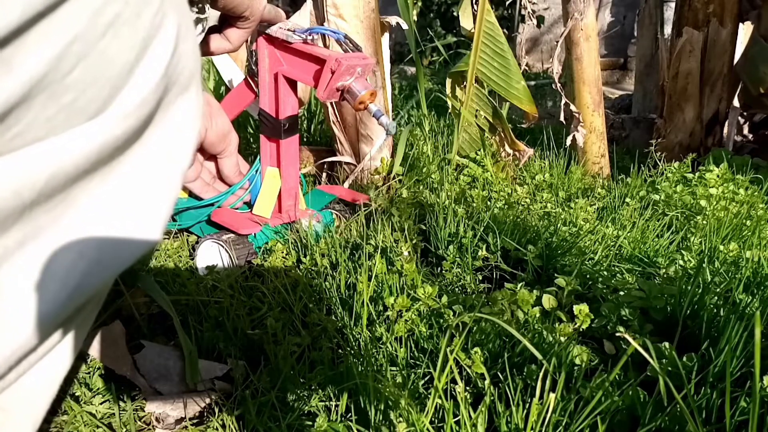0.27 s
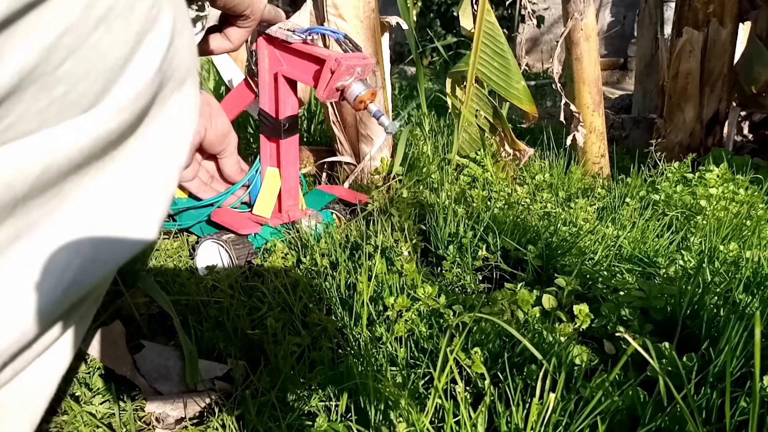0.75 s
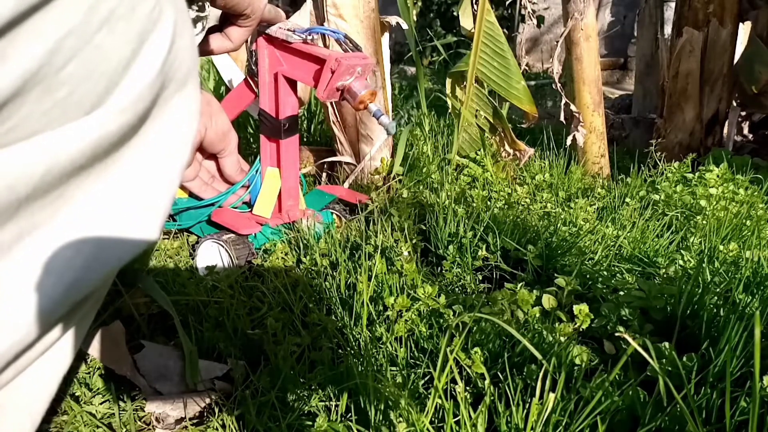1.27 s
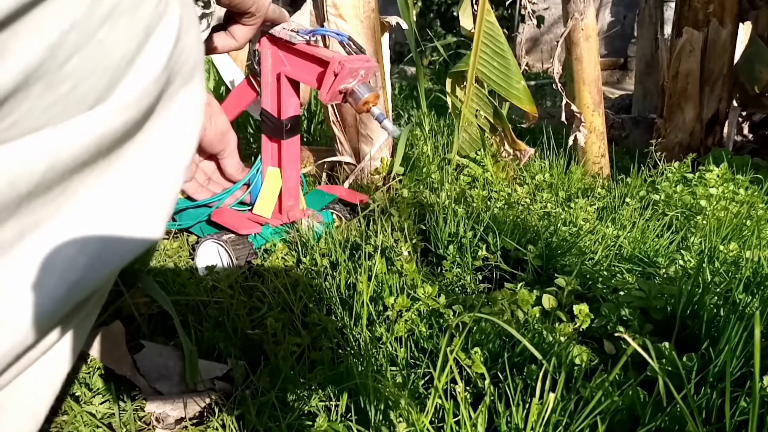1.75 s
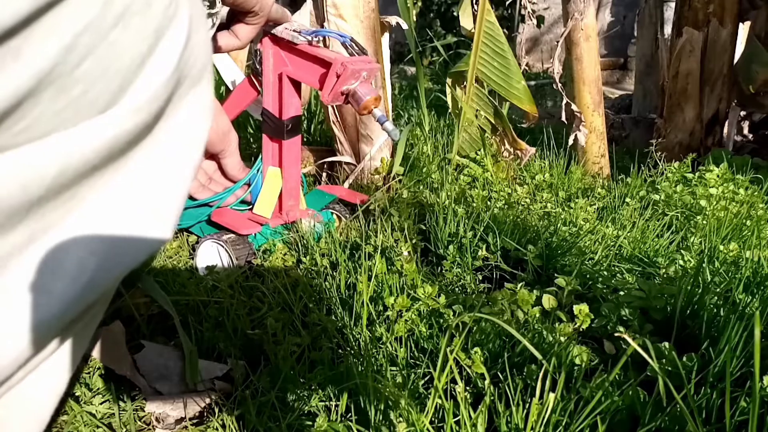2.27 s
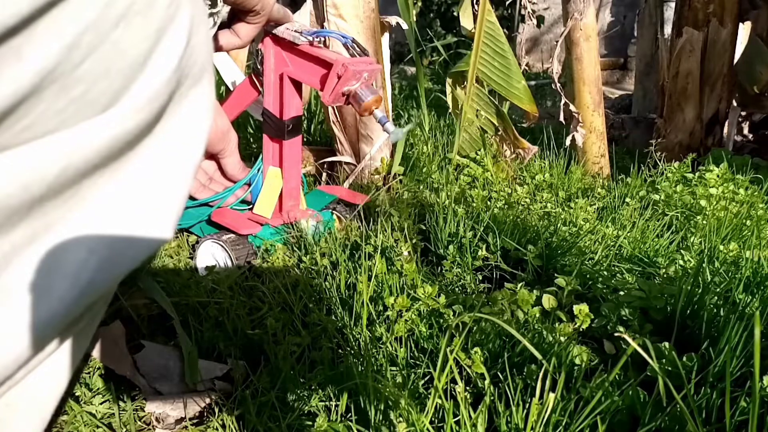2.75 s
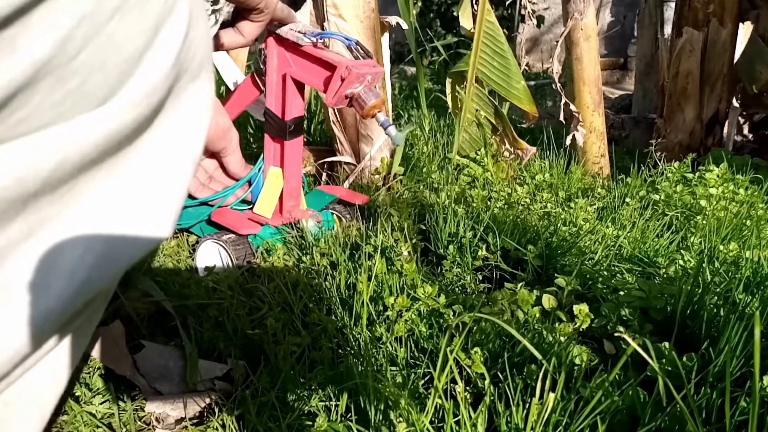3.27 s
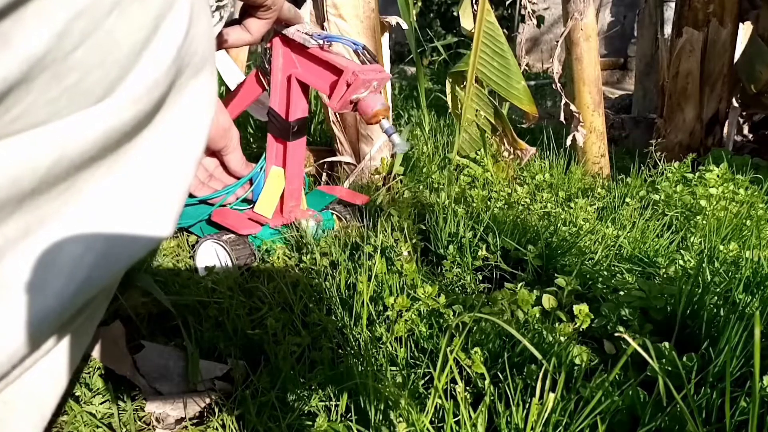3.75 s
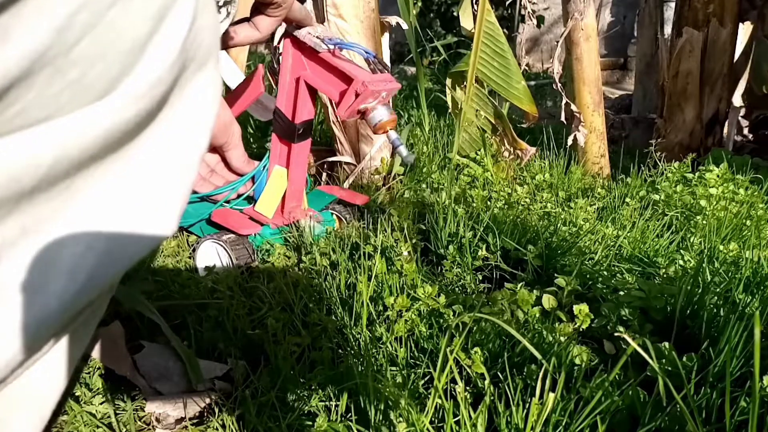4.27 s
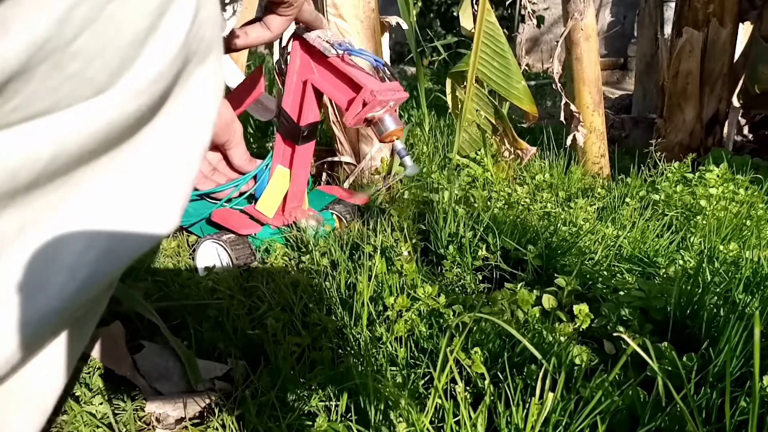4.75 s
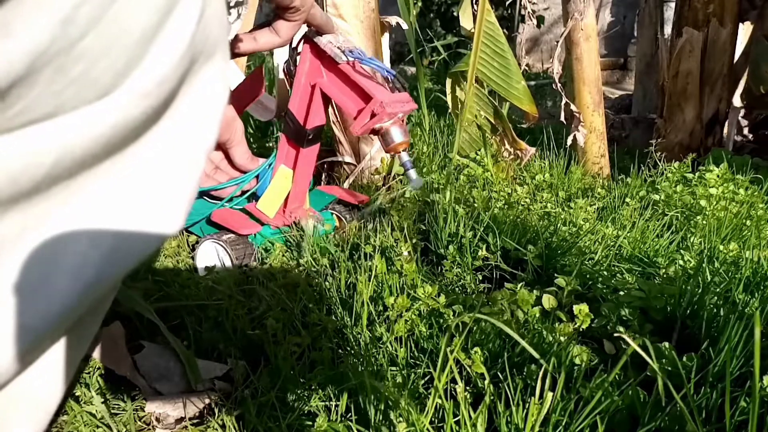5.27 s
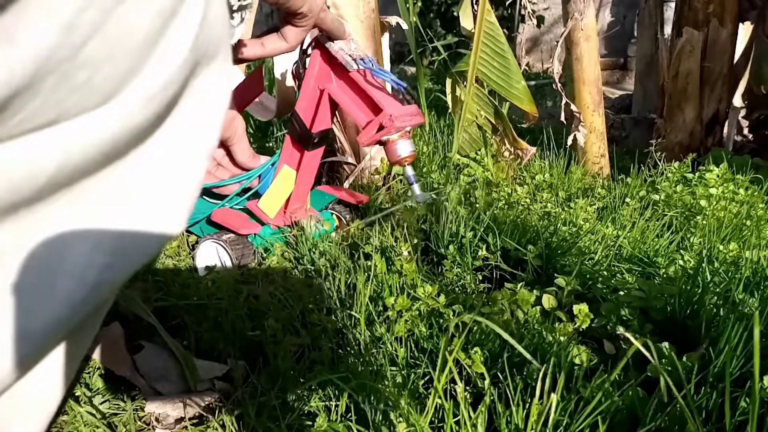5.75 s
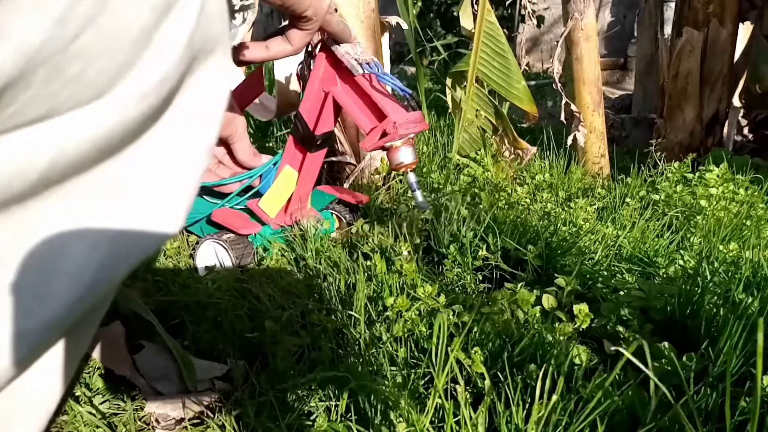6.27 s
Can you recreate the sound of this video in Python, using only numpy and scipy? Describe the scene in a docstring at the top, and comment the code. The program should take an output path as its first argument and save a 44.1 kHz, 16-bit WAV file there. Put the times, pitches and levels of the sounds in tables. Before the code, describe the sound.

Heard close and dry outdoors, in the right channel only, with the left silent. After a near-silent instant, a small brushless motor gives rapid rattling jerks from 0.05 to 0.2 seconds, then catches and settles into a light idle: bearing rattle, thin high electric whine and a soft airy swish from its whirling wire. Around 0.9 to 1.2 seconds it steps up, brighter and louder. From 2.1 to 2.5 it surges to full speed, whine tones fanning out and the swish sweeping up into a loud, piercing hiss, flaring briefly, over a low fluttering hum. It holds steady; from about 3.5 the hum slowly grows. From 4.9 the wire works into grass: buzzing, rough knocking and crackling snaps strengthen, with soft air thumps around 5.6 to 5.8 and sharper bites near 6 and 6.4. It is still running at the end, about 6.5 seconds.

```python
"""Wire grass trimmer, close up

A small brushless motor whirls a two-ended cutting wire over a lawn; one microphone feeds the right channel.
It chatters into life and is throttled up in three steps. The chopped drive current is a set of sines that
whine; the wire's swish is noise read along its path, so its pitch climbs with speed.
At full throttle the head tips down: grass snaps and a frame buzz, patterned once a turn, grow louder as the
wire bites, and puffs of air buffet the microphone."""
import sys
import numpy as np
from scipy import signal
from scipy.fft import rfft, irfft, next_fast_len
from scipy.io import wavfile
from scipy.ndimage import map_coordinates

SR = 44100
rng = np.random.default_rng(int(sys.argv[2]) if len(sys.argv) > 2 else 0)


def unload_wav(signal):
    """Save mono or channel-first audio to the path in sys.argv[1] as 16-bit WAV at rate SR, clipped to [-1, 1]."""
    wavfile.write(
        sys.argv[1],
        SR,
        np.round(np.clip(np.atleast_2d(signal).T, -1, 1) * 32767).astype(np.int16),
    )


N = 287091
TIME = np.arange(N) / SR
FULL_SPEED_HZ = 117  # shaft turns per second
LOADING_S = (4.9, 6.05)  # the wire works its way into the grass (from, to)

# Throttle steps idle, half, full. Each row: start in seconds, time the knob takes in seconds,
# shaft turns per second asked for.
THROTTLE = [(.154, .002, 57.8), (.911, .206, 73.9), (2.104, .322, 116.9)]
SPIN_UP_S = 0.114  # time constant
CREEP_FROM_S, CREEP_HZ_PER_S = 5.35, 2.9


def shaft():
    """The rotor lags the throttle, then creeps up; strain (0-1) is the share of the asked speed still missing."""
    asked = np.zeros(N)
    for start_s, knob_s, hz in THROTTLE:
        asked = asked + (hz - asked) * ramp(start_s, start_s + knob_s)
    keep = np.exp(-1 / (SPIN_UP_S * SR))
    speed = signal.lfilter([1 - keep], [1, -keep], asked)
    strain = (asked - speed) / (asked + 1e-9)
    creep = CREEP_HZ_PER_S * np.maximum(TIME - CREEP_FROM_S, 0)
    unsteadiness = 1 + 0.001 * walk(16) + 0.0012 * walk(1.5)
    return (speed + creep) * unsteadiness, strain


# Broad turbulence of the wire, as read at full speed. Each row: frequency in Hz, relative density in dB per Hz.
TURBULENCE = [(60, -81), (160, -12), (330, -17), (700, -17.5), (1300, -20.5), (2500, -11), (3800, -6.5),
              (5000, 3), (7200, 6.5), (8400, -11), (10500, -21), (16000, -25.5)]
# Brief dips of the swish. Each row: centre in seconds, half-width in seconds, depth in dB.
DIPS = [(6.126, 0.022, -6.5), (6.347, 0.036, -3.5), (6.5, 0.047, -2.5)]
SWISH_DB, SWISH_DB_PER_DOUBLING = -21, 16.5  # at full speed; growth with speed
SWISH_STRAIN_DB = 39  # per unit strain at full speed


def swish(turns, speed, strain, running):
    """The wire sheds eddies, orderly when slow and more turbulent when fast; they flare as each end sweeps by."""
    eddies = eddy_tone(speed)
    envelope = np.abs(signal.hilbert(eddies))
    eddies = unit(eddies / (envelope + 0.1) ** 0.16)  # shedding limits its own strength
    turbulence = whirl(TURBULENCE, turns) * undb(0.4 * walk(8))
    eddy_gain = by_throttle(speed, levels_db=[-13.5, -7.0, -6.5]) * by_load(0, loaded_db=-2.4)
    turbulence_gain = by_throttle(speed, levels_db=[-9.5, -10.0, -7.0]) * by_load(0, loaded_db=0.4)
    air_noise = eddy_gain * eddies + turbulence_gain * turbulence
    flare = unit(1 + 1.2 * np.exp(-(2 * turns % 1) / 0.15))
    flutter = undb(0.55 * walk(40) + 0.25 * walk(9))
    # louder while the wire is being flung up to full speed
    strain_db = SWISH_STRAIN_DB * strain * (speed / FULL_SPEED_HZ) ** 3
    dips_db = sum(db * bump(s, width_s) for s, width_s, db in DIPS)
    gain = speed_law(speed, SWISH_DB_PER_DOUBLING) * undb(SWISH_DB + strain_db + dips_db)
    return air_noise * flare * flutter * running * gain


# Eddy tone of the wire, as read at full speed. Each row: frequency in Hz, relative density in dB per Hz.
EDDIES = [(60, -65), (3500, -29), (5000, -26), (5600, -1), (6400, 4.5), (6950, 1), (7600, -29), (8400, -45),
          (16000, -74)]
EDDY_HOLD_HZ, EDDY_BREAK_HZ = 81.6, (81.5, 109.7)  # turns per second: pitch holds; band breaks over (from, to)


def eddy_tone(speed):
    """Orderly eddies climb with speed, hold their pitch, then give way to a higher band."""
    low = whirl(EDDIES, np.cumsum(np.minimum(speed, EDDY_HOLD_HZ)) / SR)
    high = whirl(EDDIES, np.cumsum(np.sqrt(speed * FULL_SPEED_HZ)) / SR)
    share = np.interp(speed, EDDY_BREAK_HZ, [0, 1])
    return np.sqrt(1 - share) * low + np.sqrt(share) * high


def whirl(spectrum, turns):
    """Noise read off along the wire's path, so that its whole spectrum scales with speed."""
    noise = signal.resample_poly(colour(rng.standard_normal(N), spectrum), 2, 1)
    return unit(map_coordinates(noise, [2 * SR * turns / FULL_SPEED_HZ], order=3, mode="wrap"))


# The controller's chopping rate sags as it works harder. Each row: time in seconds, rate in Hz.
CHOP_RATE = [(0.1, 7975), (0.8, 7950), (1.8, 7942), (2.9, 7912), (5.2, 7909), (6.4, 7900)]
# Bare chopping tone, before CHOP_GAIN_DB. Each row: time in seconds, level in dB.
CHOP_LEVEL = [(0.0, -54), (0.16, -49), (0.36, -66), (0.7, -52), (0.94, -68), (1.41, -53), (1.68, -54),
              (2.35, -38.5), (4.31, -38.5), (4.51, -49), (4.72, -46.5), (5.18, -31.5), (5.79, -33.5),
              (6.5, -31.5)]
CHOP_GAIN_DB = -1.5
# Magnetic whine. Each key: multiple of the chopping rate, plus multiple of the shaft rate.
# Each value: level in dB at half throttle, level in dB at full, change under load in dB.
WHINE = { (0, 35): (-53, -52, 5), (0, 63): (-66, -42.5, -6), (0, 70): (-57, -72, 0),
         (1, -42): (-50.5, -67, 13.4), (1, -35): (-50.5, -65, 0), (1, -21): (-60, -46, 7),
         (1, -14): (-49.5, -40.5, 4.3), (1, 10): (-67, -60, -2), (1, 14): (-48.5, -45.5, -5),
         (1, 21): (-63, -69, 0), (1, 28): (-67, -72, 0), (2, -14): (-66, -77, -4), }
MAGNETS = 14  # the strongest side tones lie one magnet-passing rate either side of the chopping tone
WHINE_IDLE_DB = -9.5  # all tones, idle against half throttle
WHINE_STRAIN_DB = 9  # strongest pair, per unit strain


def whine(turns, speed, strain, running):
    """The chopped current sings in the windings; commutation splits off side tones that fan out with speed."""
    chop = np.cumsum(np.interp(TIME, *np.transpose(CHOP_RATE)) + 2 * walk(14)) / SR
    chop_db = np.interp(TIME, *np.transpose(CHOP_LEVEL)) + CHOP_GAIN_DB
    out = undb(chop_db) * tone(chop, waver_db=0.5, waver_rate=18)
    surge = np.sqrt(running) * undb(WHINE_STRAIN_DB * strain)
    for (c, k), (half_db, full_db, load_db) in WHINE.items():
        # the strongest pair follows the current from the first turn; the others need speed
        drive = surge if c == 1 and abs(k) == MAGNETS else running ** 4
        gain = by_throttle(speed, [half_db + WHINE_IDLE_DB, half_db, full_db]) * by_load(0, load_db)
        # plain commutation tones are rough, side tones clean
        blur = 0.2 * walk(75) if c == 0 else 0
        out = out + drive * gain * tone(c * chop + k * turns + blur, waver_db=1.5, waver_rate=9)
    return out


# Magnets passing the stator slots. Each row: multiple of the shaft rate, housing resonance in Hz,
# its width in Hz, level at resonance in dB.
SLOTS = [(37, 1860, 450, -55), (105, 5350, 300, -52)]


def slots(turns, running):
    """Magnets passing the stator slots whistle, loudest while the pitch climbs through a housing resonance."""
    out = 0
    for k, hz, width_hz, db in SLOTS:
        whistle = tone(k * turns + 0.1 * walk(40), waver_db=1.5, waver_rate=11)
        out = out + ring(whistle, [(hz, width_hz, db)])
    return running ** 4 * out


# Bursts of chatter, mostly before the rotor locks to the drive. Each row: start in seconds,
# length before release in seconds, drive level in dB.
JERKS = [(0.054, 0.0024, -41.5), (0.064, 0.0021, -35), (0.073, .002, -36), (0.0805, 0.012, -33),
         (0.107, .012, -31.5), (.126, .003, -36), (0.14, 0.027, -31), (0.176, .006, -30.5),
         (.541, .001, -36)]
JERK_RELEASE_S = 0.004
# Resonances of motor and mount. Each row: frequency in Hz, width in Hz, relative gain in dB.
HOUSING = [(720, 590, -20.5), (1907, 200, -10), (2575, 300, -8.5), (4125, 260, -5), (4520, 160, 0),
           (5400, 244, 1.5), (5950, 120, 1), (6320, 620, -6.5), (7850, 290, -7), (8520, 370, -15.5),
           (10300, 1900, -20), (13000, 6400, -30)]
RATTLE_FROM_HZ = (6.1, 18)  # bearings fade in between these turns per second
RATTLE_DB = (-40.5, -35.5, -35)  # bearing drive at idle, half, full throttle
RATTLE_STRAIN_DB = 8.5  # per unit strain


def rattle(speed, strain):
    """The rotor jerks at start-up, then the bearings rattle on; both ring the housing; one thin ring stands out."""
    jerks = 0
    for start_s, length_s, db in JERKS:
        release = np.exp(-np.maximum(TIME - start_s - length_s, 0) / JERK_RELEASE_S)
        jerks = jerks + undb(db) * (TIME >= start_s) * release
    onset = np.interp(speed, RATTLE_FROM_HZ, [0, 1])
    bearing_gain = onset * by_throttle(speed, RATTLE_DB) * undb(RATTLE_STRAIN_DB * strain)
    bearings = bearing_gain * unit(grains(rate=6000, spread_db=2.5))
    shake = jerks * rng.standard_normal(N) + bearings
    thin_ring = unit(ring(rng.standard_normal(N), [(5190, 27, 0)])) * by_load(free_db=-39, loaded_db=-50)
    return undb(4.5) * ring(shake, HOUSING) + speed_law(speed, db_per_doubling=27) * thin_ring


# Weaker hum of the unbalanced rotor and the wire. Each key: multiple of the shaft rate.
# Each value: level in dB at full speed running free, the same under load, growth in dB per doubling of speed.
HUM = {1: (-54.5, -55.5, 23), 3: (-65, -53, 26), 4: (-57, -56, 17), 5: (-68, -59.5, 22),
       6: (-63.5, -61, 15.4), 8: (-66, -64, 9), 11: (-81, -59, 0), 12: (-70, -73, 6), 13: (-85, -58, 6),
       14: (-63.5, -78, 9.7)}
TIPPING_S = (3.45, 6.56)  # the head tips down (from, to)
# main hum: at full speed, gain as the head tips, loss under load
MAIN_HUM_DB, MAIN_TIP_DB, MAIN_LOAD_DB = -42.5, 6.5, -4


def hum(turns, speed, running):
    """Each wire end pushes air once a turn, so the second order leads; the wire's flexing blurs higher ones."""
    orders = 0
    for k, (free_db, loaded_db, slope_db) in HUM.items():
        flex = 0.016 * min(k, 8) * walk(40)
        gain = by_load(free_db, loaded_db) * speed_law(speed, slope_db)
        orders = orders + gain * tone(k * turns + flex, waver_db=2.0, waver_rate=11)
    main_db = MAIN_HUM_DB + MAIN_TIP_DB * ramp(*TIPPING_S) + MAIN_LOAD_DB * ramp(*LOADING_S) ** 3
    main_gain = undb(main_db) * speed_law(speed, db_per_doubling=16.5)
    main = main_gain * tone(2 * turns, waver_db=0.6, waver_rate=6.6)
    return running ** 2 * (orders + main)


BUZZ_DB = (-50.5, -43)  # at full speed: running free, under load


def buzz(turns, speed):
    """Each end of the wire knocks the frame, unequally and a little differently on each turn; load swells it."""
    count = 1000
    turn = turns.astype(int) % count
    size, early = rng.standard_normal((count, 2)).T
    place = turns % 1 + 0.0014 * early[turn]
    first_end = np.exp(-((place - 1 / 4) / 0.006) ** 2)
    second_end = 0.5 * np.exp(-((place - 3 / 4) / 0.006) ** 2)
    blow = first_end + second_end
    knocks = np.diff(blow, prepend=blow[0]) * undb(1.3 * size[turn])
    frame = ring(knocks, [(1390, 540, -1.5), (2830, 240, 4), (3580, 490, 7.0), (4160, 620, 4.5), (5230, 460, 6.5)])
    return by_load(*BUZZ_DB) * speed_law(speed, db_per_doubling=25) * unit(frame)


# The wire bites into a tuft. Each row: centre in seconds, half-width in seconds, level in dB.
BITES = [(5.95, .035, -41.5), (6.05, .04, -45), (6.42, .05, -47)]
GRASS_DB, GRASS_DB_PER_DOUBLING = (-49, -46), 16  # at full speed, free and under load; growth with speed


def grass(speed):
    """Blades of grass snap against the wire in tufts and ring the cutter head."""
    blades = grains(rate=2000, spread_db=3.5)
    snaps = ring(blades, [(2860, 100, 5.5), (2496, 81, 5.0), (4600, 2400, 3.0), (9700, 4600, -13)])
    tufts = undb(2.5 * walk(14))
    head = unit(ring(grains(rate=1800, spread_db=4), [(2870, 110, 0)]))
    bites = sum(undb(db) * bump(s, width_s) for s, width_s, db in BITES)
    snap_gain = by_load(*GRASS_DB) * speed_law(speed, GRASS_DB_PER_DOUBLING)
    return snap_gain * tufts * unit(snaps) + bites * head


# Puffs of air on the microphone. Each row: centre in seconds, half-width in seconds, level in dB.
PUFFS = [(5.62, 0.018, -44), (5.703, .016, -36.5), (5.773, 0.014, -45), (5.815, 0.031, -38),
         (6.114, 0.022, -43), (6.197, 0.013, -47)]
RUMBLE_DB = (-62, -58, -63.5)  # at idle, half, full throttle


def air(speed):
    """Stirred air is a low rumble of filtered noise; puffs are swells of deeper noise on the microphone."""
    rumble = unit(colour(rng.standard_normal(N), [(20, -36), (55, -18), (90, 1), (170, -6), (400, -15.5),
                                                  (800, -27), (2000, -42), (16000, -40)]))
    gusts = unit(colour(rng.standard_normal(N), [(20, -35), (55, -9), (90, 3), (150, -4), (240, -6.5),
                                                 (500, -32), (3000, -80)]))
    puffs = sum(undb(db) * bump(s, width_s) for s, width_s, db in PUFFS)
    return rumble * by_throttle(speed, RUMBLE_DB) * undb(2 * walk(6.32)) + puffs * gusts


def by_throttle(speed, levels_db):
    """A gain that glides with speed between its levels at idle, half and full throttle."""
    return undb(np.interp(speed, [hz for _, _, hz in THROTTLE], levels_db))


def by_load(free_db, loaded_db):
    """A gain that crosses over as the wire works into the grass."""
    return undb(free_db) + (undb(loaded_db) - undb(free_db)) * ramp(*LOADING_S)


def speed_law(speed, db_per_doubling):
    """A gain of 1 at full speed that follows a power of the speed."""
    return undb(db_per_doubling * np.log2(speed / FULL_SPEED_HZ + 1e-6))


def ramp(start_s, end_s):
    """Rises from 0 to 1 between two times."""
    return np.clip((TIME - start_s) / (end_s - start_s), 0, 1)


def bump(centre_s, width_s):
    """A smooth swell of height 1 around a moment."""
    return np.exp(-((TIME - centre_s) / width_s) ** 2)


def tone(cycles, waver_db, waver_rate):
    """A sine of rms near 1 whose level wavers."""
    return np.sqrt(2) * np.sin(2 * np.pi * (cycles + rng.random())) * undb(waver_db * walk(waver_rate))


def grains(rate, spread_db):
    """Random clicks of uneven size, at a mean rate per second."""
    hits = rng.random(N) < rate / SR
    return hits * rng.standard_normal(N) * undb(spread_db * rng.standard_normal(N))


def ring(x, modes):
    """Drive a set of (Hz, width Hz, dB) resonances of alternating sign."""
    out = 0
    for k, (hz, width_hz, db) in enumerate(modes):
        b, a = signal.iirpeak(hz, hz / width_hz, fs=SR)
        out = out + (-1) ** k * undb(db) * signal.lfilter(b, a, x)
    return out


def colour(x, points):
    """Filter by a spectrum of (Hz, dB) points."""
    hz, db = np.transpose(points)
    size = next_fast_len(len(x) + SR // 10)
    bins = np.fft.rfftfreq(size, 1 / SR)
    gain = undb(np.interp(np.log(bins + 1), np.log(hz), db))
    return irfft(rfft(x, size) * gain, size)[:len(x)]


def walk(rate):
    """A smooth random wander of spread 1, with `rate` new points per second."""
    points = rng.standard_normal(400)
    return unit(map_coordinates(points, [TIME * rate], order=3, mode="wrap"))


def unit(x):
    """Scale to rms 1."""
    return x / np.sqrt(np.mean(x ** 2) + 1e-18)


def undb(db):
    """Decibels to gain."""
    return 10 ** (np.asarray(db) / 20)


def scene():
    """One shaft drives motor, wire, grass and air."""
    speed, strain = shaft()
    turns = np.cumsum(speed) / SR
    running = np.clip(speed / 48, 0, 1)
    wire = swish(turns, speed, strain, running ** 6) + hum(turns, speed, running ** 2) + buzz(turns, speed)
    motor = whine(turns, speed, strain, np.sqrt(running)) + slots(turns, running) + rattle(speed, strain)
    return np.array([wire + motor + grass(speed) + air(speed)])


TOP_HZ = 15550


def record(dry):
    """The microphone lifts the very top, rounds the highest peaks, cuts off above and feeds the right alone."""
    bright = colour(2 * dry[0], [(20, 0.54), (13900, 4.47), (14300, 15.0), (14900, 14.3), (15500, 20)])
    rounded = bright / (1 + (bright / 0.8) ** 6) ** (1 / 6)
    low_pass = signal.ellip(10, 0.2, 80, TOP_HZ, fs=SR, output="sos")
    right = signal.sosfilt(low_pass, rounded)
    return np.array([np.zeros(N), right])


dry = scene()
out = record(dry)
unload_wav(out)
```